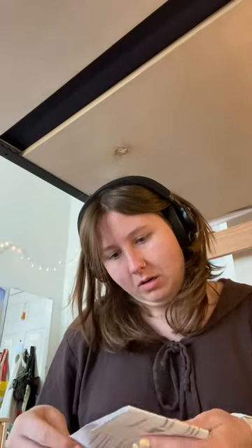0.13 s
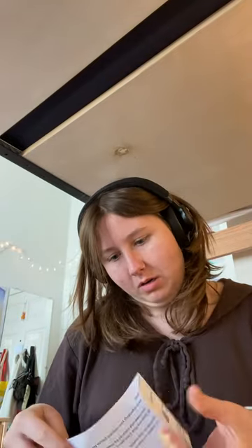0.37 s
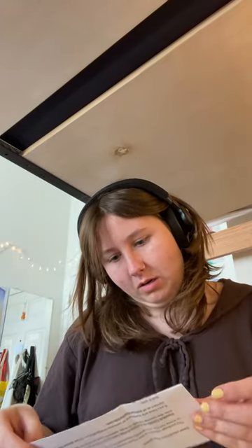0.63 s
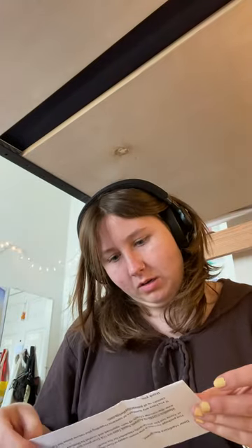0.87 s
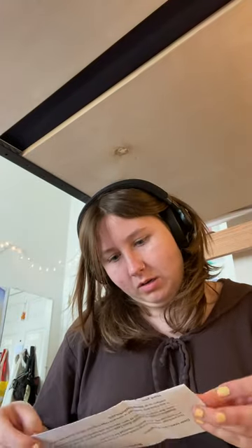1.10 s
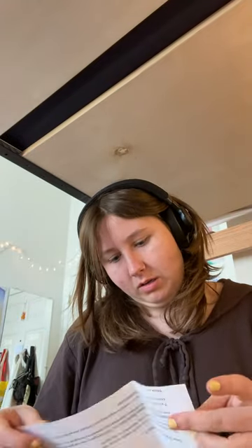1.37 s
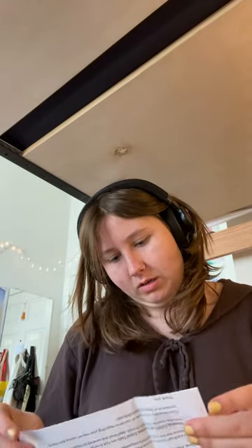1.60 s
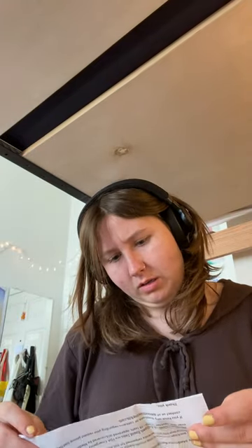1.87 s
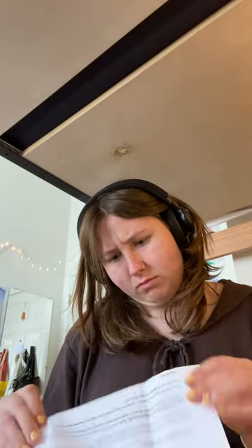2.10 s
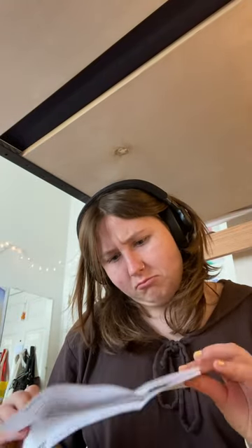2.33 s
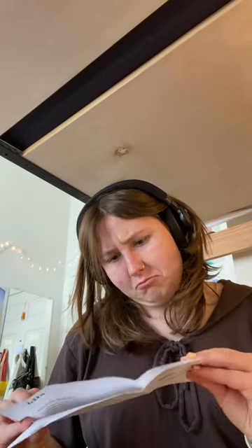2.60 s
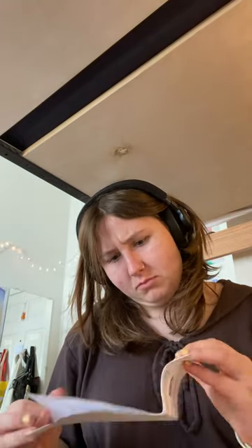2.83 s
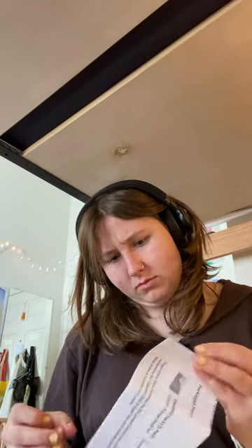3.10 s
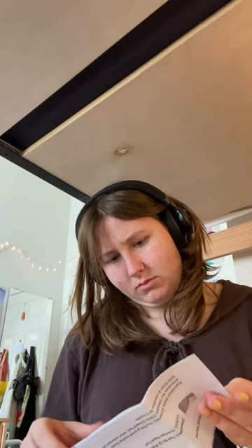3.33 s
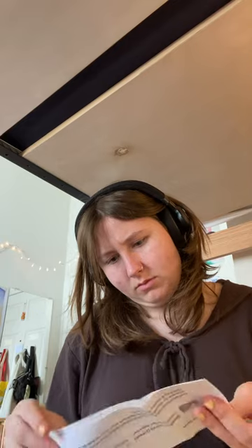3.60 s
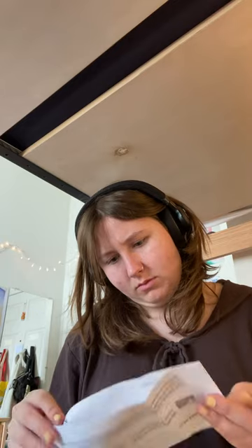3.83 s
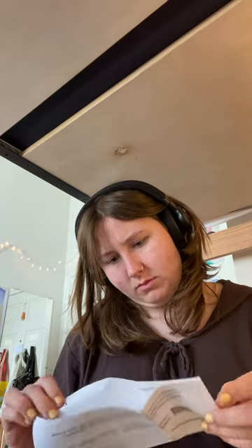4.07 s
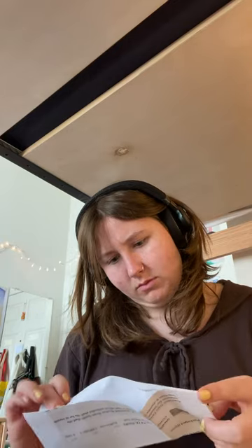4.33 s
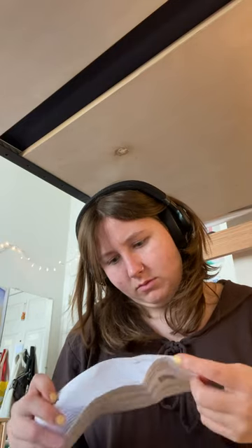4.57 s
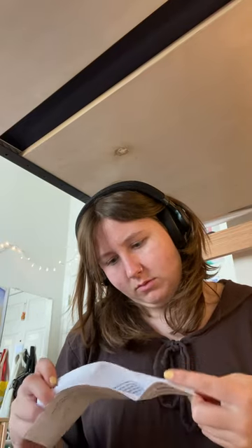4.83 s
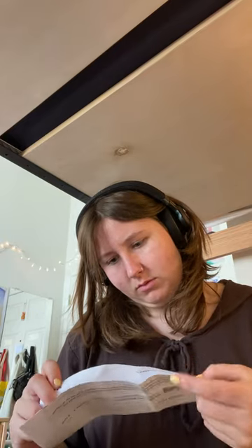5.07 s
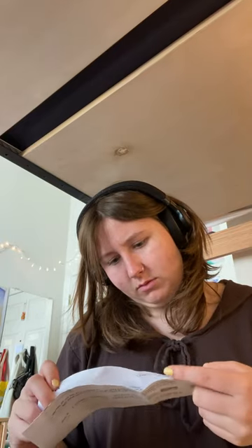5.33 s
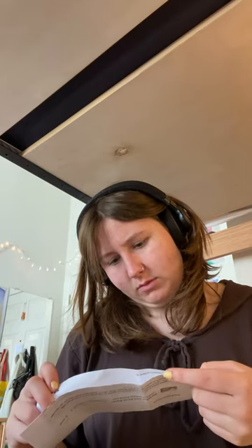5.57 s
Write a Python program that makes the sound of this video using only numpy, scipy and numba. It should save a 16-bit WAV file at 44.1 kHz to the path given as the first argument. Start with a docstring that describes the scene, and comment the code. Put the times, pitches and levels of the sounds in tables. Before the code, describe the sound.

Hands unfold and turn a sheet of paper close to a stereo microphone. A short rustle with small crackles comes first, then a quiet gap, a crisp snap, scattered crinkles, a tight burst of sharp snaps near the middle, a busy swishing rustle ending in the loudest crack, and one more pop before faint ticks. Small quiet room with low ventilation rumble and faint fan hum.

```python
"""A folded sheet of paper is opened, turned and smoothed by hand at a desk in a quiet room.
Fingers and folds slide over the fibres (rustle: filtered trains of tiny slips), creases buckle
(snaps: short noise bursts ringing the sheet) and the sheet flaps (soft low resonances).
Desk and walls echo it to a close pair of microphone ports, over ventilation noise and a fan hum."""
import sys
import numpy as np
from scipy import signal
from scipy.fft import rfft, irfft, next_fast_len
from scipy.io import wavfile
from numba import njit

SR = 44100
rng = np.random.default_rng(int(sys.argv[2]) if len(sys.argv) > 2 else 0)


def amplitude_ratio(level_db):
    """Convert a level in decibels to the matching linear amplitude (field) ratio."""
    exponent = np.asarray(level_db, float) / 20
    return 10 ** exponent


def log_audio(samples):
    """Write samples as a 16-bit WAV file to the path given in sys.argv[1]."""
    # one column per channel
    frames = np.atleast_2d(samples).T
    # limit to full scale, then quantise
    limited = np.clip(frames, -1, 1)
    pcm = np.round(limited * 32767).astype(np.int16)
    wavfile.write(sys.argv[1], SR, pcm)


N = 250884   # samples, about 5.7 s

# Room tone. Each row: frequency in Hz, relative level per Hz in dB.
AIR_SPECTRUM = [(13, -36), (30, -19), (65, 3.5), (95, 2.5), (120, -2), (145, -8), (180, -15), (215, -11.5),
                (400, -15.5), (620, -12.5), (800, -20), (1000, -24), (1700, -26), (2170, -19.5),
                (2760, -31), (4000, -32.5), (6000, -47.5), (13900, -80.5)]
AIR_DB = -54.5
# How alike the room tone is at the two ports. Each row: frequency in Hz, correlation from -1 to 1.
AIR_LIKENESS = [(60, 1), (130, 0.97), (280, 0.66), (610, -0.17), (1320, 0.32), (2860, 0.32), (6200, -1),
                (13400, -0.42)]
# Fan motor tones. Each row: frequency in Hz, width in Hz, level in dB.
FAN_TONES = [(118.9, 9, -67.5), (179.6, 12, -69)]

# Bounce off the desk, a row for the left port, then the right: delay in ms, level in dB.
DESK_BOUNCE = [(.155, -3.5), (0.209, 0)]
BOUNCE_CUT_HZ = 3040   # the desk bounce loses its treble above
# Echo off the nearest hard face, a row for the left port, then the right: delay in ms, level in dB.
WALL_ECHO = [(2.299, -13), (2.452, -25.5)]
RIGHT_LEAD_MS = 0.017   # the sound reaches the right port this much earlier
ROOM_T60_S, ROOM_DB, ROOM_CUT_HZ = 0.14, -15, 20000
# Which hand works the sheet. Each row: time in seconds, left minus right gain in dB.
HANDS = [(0, 0), (1.4, 1.5), (1.75, 0.5), (2.1, 0.5), (2.4, 0.7), (2.7, 0.8), (3.1, 0), (3.3, 0.5),
         (3.65, 0.5), (3.82, 0.3), (4.2, 0.2), (4.6, 0.8), (5.69, 3)]
PORT_CUT_HZ = 10840
SIDE_RISE_HZ, SIDE_RISE_DB = 11600, 29.5   # above this pitch the side is raised: the top treble differs far more between left and right

# Bending modes of the whole sheet. Each row: frequency in Hz, width in Hz, relative level in dB.
SHEET_MODES = [(560, 233, -3), (1132, 170, -0.5), (1595, 560, -3.5), (2137, 400, 6), (3240, 1900, 0.5)]
# Small panels between creases, before the pull shifts their pitch.
# Each row: frequency in Hz, width in Hz, relative level in dB.
SMALL_PANELS = [(3900, 320, 4.5), (4990, 660, 1.5), (6100, 1100, 0.5), (7800, 2100, -7)]
# The hands pull the sheet tauter or let it sag. Each row: time in seconds, # pitch of the third small panel,
# where the singing panel also sits, in Hz, pitch where the body rings best in Hz.
TAUTNESS = [(0, 6100, 1184), (.235, 6100, 1690), (.3, 5500, 2200), (.42, 5800, 1317), (1.4, 5900, 1085),
            (1.63, 6300, 900), (1.69, 6950, 1500), (1.76, 6200, 2200), (2.1, 6100, 1920),
            (2.66, 5500, 1576), (2.73, 5560, 1525), (2.778, 5040, 1820), (3.07, 5940, 1207),
            (3.1, 5850, 1910), (3.21, 6300, 1092), (3.27, 6400, 1300), (3.29, 6200, 1885),
            (3.305, 5900, 1185), (3.6, 6500, 1924), (3.635, 6340, 2000), (3.66, 5630, 2100),
            (3.719, 5740, 1976), (3.74, 5360, 1477), (3.86, 6200, 1730), (4.25, 5900, 988),
            (4.46, 6160, 2000), (4.51, 7020, 892), (4.58, 6050, 1990), (4.62, 4950, 1420),
            (5.69, 6000, 1292)]
BODY_TOP_HZ = 2820   # the body stops ringing above

# The sheet flapping or knocking the desk. Each row: start in seconds, peak in dB, pitch in Hz.
FLAPS = [(.085, -47.5, 532), (.173, -51.5, 547), (.193, -46, 525), (.235, -39, 563), (0.244, -43, 245),
         (0.316, -51.5, 564), (0.334, -50, 148), (1.412, -54.5, 560), (1.634, -49.5, 342),
         (1.637, -44.5, 149), (1.743, -42, 557), (2.063, -52.5, 350), (2.07, -59, 500), (2.084, -53.5, 475),
         (2.109, -50, 390), (2.244, -53, 337), (2.355, -48.5, 444), (2.711, -42, 186), (2.714, -41, 614),
         (2.756, -46, 280), (3.071, -46, 536), (3.142, -43, 410), (3.145, -40.5, 273), (3.151, -44.5, 196),
         (3.158, -52, 363), (3.215, -42, 470), (3.236, -46, 570), (3.261, -50, 590), (3.271, -53, 487),
         (3.303, -43, 393), (3.329, -51, 425), (3.454, -47.5, 480), (3.736, -51, 610), (3.748, -50.5, 167),
         (3.822, -41.5, 504), (3.824, -43.5, 297), (4.009, -49.5, 450), (4.246, -52, 152),
         (4.506, -43, 415), (4.514, -44.5, 154), (4.498, -52, 410), (4.522, -51, 400), (4.53, -48, 480),
         (4.535, -49, 493), (4.553, -53, 600), (4.549, -47, 151), (4.621, -33, 552), (4.623, -38, 300),
         (4.647, -43, 141), (4.783, -55, 153), (5.004, -49.5, 584)]
FLAP_T60_S, FLAP_T60_S_PER_KHZ = 0.016, 0.032   # a tauter, higher panel rings longer

# Creases buckling. Each row: start in seconds, crack peak in dB, crack pitch in Hz,
# body peak in dB, crack t60 in ms (3 at least).
SNAPS = [(0.086, -64, 6420, -46, 12), (0.173, -63, 5060, -43, 15), (0.197, -60, 5000, -48, 17),
         (0.233, -36, 4640, -31.5, 20), (0.2386, -34.5, 3450, -28, 23), (0.3, -32.5, 5440, -50, 18),
         (0.3137, -44, 5570, -39, 20), (0.331, -30, 6500, -41.5, 13), (.348, -47, 4300, -43, 18),
         (.358, -56, 5500, -50, 14), (0.3735, -62, 5170, -54, 13), (0.4238, -49.5, 5000, -45, 18),
         (0.497, -64, 5000, -60, 15), (0.5328, -42, 5960, -55, 21), (1.356, -58, 4340, -46.5, 17),
         (1.381, -57, 3460, -55, 18), (1.411, -58, 5220, -51.5, 11), (1.4917, -52, 4870, -63, 24),
         (1.559, -56.5, 6540, -53, 29), (1.606, -55, 6400, -52, 18), (1.633, -41.5, 6600, -40.5, 31),
         (1.674, -41, 7000, -50, 13), (1.7223, -50, 6760, -51, 17), (1.741, -18.5, 3900, -24.5, 17.6),
         (1.744, -27.5, 3530, -38, 11), (1.756, -42, 6000, -54, 17), (1.826, -43, 3780, -40.5, 25),
         (2.063, -45, 4340, -42, 24), (2.092, -52, 5000, -45, 16), (2.11, -46, 5500, -60, 17),
         (2.1435, -30, 5050, -31, 9.3), (2.2092, -68, 4170, -47.5, 8.4), (2.2412, -36, 5040, -34.5, 25),
         (2.3539, -20, 4860, -33, 9), (2.3564, -24.5, 4900, -46, 12.6), (2.409, -46.5, 5760, -49, 33),
         (2.4964, -45, 4020, -66, 23), (2.5708, -52, 3900, -47, 16), (2.6769, -18.5, 4260, -32.5, 12),
         (2.6788, -22.5, 4160, -42, 13), (2.7087, -25, 4020, -23.5, 8.8), (2.7112, -13, 5750, -25.5, 11),
         (2.7149, -19.5, 4170, -24, 8.3), (2.859, -55, 4000, -52, 16), (2.895, -50, 6000, -60, 18),
         (2.9096, -50, 4180, -67, 29), (2.9686, -44, 3920, -49, 14), (2.977, -47, 5470, -63, 25),
         (3.02, -62, 3590, -51, 12), (3.039, -62, 4000, -49, 10), (3.07, -68, 3600, -36.5, 14),
         (3.099, -34, 6030, -37, 23), (3.1385, -27.5, 6250, -36, 16), (3.145, -31.5, 3800, -48, 16.4),
         (3.213, -68, 5990, -42, 17), (3.2334, -67, 4160, -44, 12), (3.239, -49, 5000, -53, 25),
         (3.247, -45, 7250, -57, 24), (3.2601, -53, 4200, -37.5, 24), (3.2655, -53, 4200, -42, 12),
         (3.271, -52, 4420, -48, 13), (3.2893, -22.5, 5600, -40, 8.7), (3.292, -31, 5030, -43, 14),
         (3.303, -42, 4120, -35, 25), (3.308, -52, 4200, -45, 16), (3.3135, -47, 4200, -46, 14),
         (3.324, -54, 5290, -38.5, 10), (3.4176, -45, 5730, -57, 25), (3.455, -50, 5530, -47, 14),
         (3.4927, -46, 5930, -57, 29), (3.51, -66, 7800, -45, 48), (3.539, -56, 6820, -53, 27),
         (3.601, -31, 4040, -53, 48), (3.633, -39, 6200, -25, 21), (3.637, -36, 5900, -46, 20),
         (3.661, -35.5, 6000, -42, 15), (3.705, -36, 5900, -47, 16), (3.737, -44, 5930, -34.5, 23),
         (3.7425, -56, 5000, -41, 14), (3.821, -10, 5980, -17, 18), (3.8268, -46, 6200, -25.5, 7.1),
         (3.838, -44, 6000, -32.5, 14), (3.861, -39, 6400, -47, 14), (3.985, -46.5, 4830, -56, 17),
         (4, -50, 6870, -47, 14), (4.224, -48.5, 5850, -58, 50), (4.251, -58, 5570, -49, 15),
         (4.2736, -57, 4000, -49, 23), (4.339, -56, 6650, -58, 28), (4.3777, -58, 6960, -50, 17),
         (4.398, -50, 5850, -57, 22), (4.4273, -46, 5200, -62, 27), (4.5076, -54, 6660, -41, 15),
         (4.515, -57, 6000, -48.5, 11), (4.532, -58, 5000, -59, 14), (4.5505, -58, 6830, -53, 21),
         (4.6, -47, 4620, -56, 20), (4.6214, -20.5, 4600, -23.5, 24), (4.64, -34.5, 4400, -38, 30),
         (4.655, -43, 4470, -50, 22), (4.756, -46, 5700, -49, 60), (4.926, -50.5, 4010, -68, 42),
         (4.989, -41.5, 4200, -65, 39), (5.003, -39, 3340, -74, 25), (5.171, -52, 5000, -56, 28),
         (5.4206, -51, 3450, -51, 20), (5.46, -56, 6850, -73, 47), (5.598, -56, 6470, -68, 23)]
SNAP_RISE_S = 0.0012
BODY_OUTLASTS = 1.37   # the body's burst has this many times the t60 of the crack's
BODY_WIDTH_HZ = 1300   # how far the body's favoured pitch reaches in a snap
FIRST_SLIP = 4.0   # the fold giving way, beside random slips averaging about 1

# Fingers and folds sliding, levels before judder and loose ticks. Each row: peak in seconds,
# swell in seconds, fade in seconds (both 0.005 at least), fibre hiss in dB, sheet body in dB.
STROKES = [(.03, 0.46, 0.49, -57, -65.5), (.11, 0.25, 0.37, -63, -67), (.215, 0.037, 0.17, -57, -59),
           (.307, 0.14, 0.071, -52, -56), (.35, .03, 0.032, -67, -51), (.39, 0.027, 0.028, -58.5, -59),
           (.465, 0.031, 0.028, -58, -67), (0.535, 0.11, 0.089, -60, -60), (.6, 0.09, 0.13, -67, -80),
           (1.345, 0.075, 0.086, -58.5, -65), (1.687, 0.015, 0.023, -40, -50),
           (1.706, 0.027, 0.0085, -47, -48.5), (1.727, 0.0046, 0.045, -47, -48.5),
           (1.758, .02, 0.074, -70, -61), (2.07, 0.02, 0.15, -49.5, -52.5), (2.108, 0.12, 0.12, -53, -51),
           (2.371, 0.05, 0.073, -55.5, -62), (2.498, 0.15, 0.039, -72, -76),
           (2.672, 0.035, 0.23, -51.5, -57), (2.721, 0.0094, 0.046, -36, -36.5),
           (2.869, 0.026, 0.048, -54, -67), (2.958, .008, 0.035, -58, -71),
           (2.975, 0.082, 0.37, -65.5, -63), (3.153, 0.23, 0.12, -60.5, -60.5),
           (3.185, .03, .02, -59.5, -62), (3.255, 0.037, 0.072, -56, -61), (3.267, 0.015, .015, -66, -43),
           (3.287, 0.017, 0.017, -53, -56), (3.308, 0.027, 0.022, -71, -40.5),
           (3.419, 0.035, 0.085, -67, -56.5), (3.494, 0.13, 0.025, -62, -63),
           (3.579, 0.015, 0.092, -70, -59), (3.595, 0.016, 1, -57, -55), (3.641, 0.12, 0.14, -41, -46.5),
           (3.7, 0.097, 0.16, -45, -49), (3.737, 0.053, 0.026, -46.5, -40.5),
           (3.855, 0.13, 0.053, -46, -51.5), (3.901, 0.19, 0.017, -52, -54),
           (3.999, 0.087, 0.25, -77, -82.5), (4.129, 0.36, 0.046, -70.5, -70.5),
           (4.237, 0.015, 0.047, -61, -57.5), (4.39, 0.025, .15, -67, -67), (4.448, 0.018, 0.18, -55, -61),
           (4.5, 0.067, 0.08, -52.5, -61), (4.54, .05, 0.12, -55, -67), (4.634, 0.13, 0.062, -50, -56),
           (4.66, .02, .1, -61, -61), (4.764, 0.039, 0.29, -62.5, -64), (4.939, 0.02, 0.032, -56.5, -59),
           (5.001, 0.076, 0.13, -64.5, -61.5), (5.177, 0.023, 0.039, -65.5, -63.5),
           (5.419, 0.033, 0.042, -59.5, -69)]
STROKE_SPAN_DB = 20   # level change over one swell or fade time
STROKE_ROUNDNESS = 1.01   # above 1 a stroke lingers near its peak and stops more abruptly
# The grip keeps a faint rustle between strokes, levels before judder and loose ticks.
# Each row: time in seconds, fibre hiss in dB, sheet body in dB.
GRIP = [(0, -93, -66), (.7, -100, -66), (1.2, -78, -70.5), (1.55, -72, -64.5), (1.8, -69, -65),
        (2.0, -90, -74), (2.5, -74, -68.5), (4.4, -77, -85), (5.69, -85.5, -69)]
JUDDER_DB, JUDDER_RATE_HZ = 1.5, 57   # skin catches and lets go along a stroke
# Colour of the rubbed fibres. Each row: frequency in Hz, relative level per Hz in dB.
FIBRE_SPECTRUM = [(1500, -47), (2500, 7), (3200, -6.5), (4200, -6.5), (6000, -8.5), (7500, -4.5),
                  (9500, -9), (11500, -12), (14000, -57.5)]
# The panel under the finger sings above the rest when the sheet is pulled tight.
# Each row: time in seconds, resonance gain in dB.
SINGING = [(0, -11), (1.6, -10), (1.69, 5), (1.75, -3), (3.58, -11), (3.63, 6), (3.72, 4.5), (3.76, -3),
           (3.85, 3.5), (3.9, -3.5), (4.44, 1), (4.46, 7.5), (4.5, -2), (5.69, -9.5)]
SING_WIDTH_HZ, RUB_WIDTH_HZ = 830, 1000   # widths of the singing panel and of the rubbed body
CRINKLES_PER_S, CRINKLE_DB, CRINKLE_HZ = 250, -15, 4600   # loose ticks; dB beside hiss or body


def rms_one(x):
    """Scale to rms 1."""
    return x / np.sqrt(np.mean(x ** 2) + 1e-20)


def at_hz(points, hz):
    """Read a table on a log-frequency axis."""
    table_hz, values = np.transpose(points)
    return np.interp(np.log(hz), np.log(table_hz), values)


def over_time(points):
    """Read a table of (seconds, value) at every sample."""
    return np.interp(np.arange(N) / SR, *np.transpose(points))


def lowpass(x, order, hz):
    """Butterworth low-pass."""
    return signal.sosfilt(signal.butter(order, hz, fs=SR, output="sos"), x)


def drift(rate_hz):
    """Slow random wander of rms 1: noise through a two-pole low-pass."""
    r = np.exp(-2 * np.pi * rate_hz / SR)
    wander = signal.lfilter([1], [1, -2 * r, r * r], rng.standard_normal(N + SR))
    return rms_one(wander[SR:])


def resonate(x, hz, width_hz):
    """One resonance, gain 1 on top."""
    r = np.exp(-np.pi * width_hz / SR)
    feedback = [1, -2 * r * np.cos(2 * np.pi * hz / SR), r * r]
    return signal.lfilter([(1 - r * r) / 2, 0, (r * r - 1) / 2], feedback, x)


@njit
def glide(x, hz, width_hz):
    """One resonance whose centre moves sample by sample."""
    r = np.exp(-np.pi * width_hz / SR)
    y = np.zeros(len(x))
    for i in range(2, len(x)):
        drive = (1 - r * r) / 2 * (x[i] - x[i - 2])
        y[i] = drive + 2 * r * np.cos(2 * np.pi * hz[i] / SR) * y[i - 1] - r * r * y[i - 2]
    return y


def room_tone():
    """Ventilation rumble and hiss: quarter-octave bands, each with its own likeness between the ports."""
    out = 0
    edges = 22 * 2 ** np.arange(0, 9.5, 1 / 4)
    white = rng.standard_normal((2, 2, N))
    for k, (low, high) in enumerate(zip(edges, edges[1:])):
        band = signal.butter(2, [low, high], "band", fs=SR, output="sos")
        mid, side = signal.sosfilt(band, white[k % 2])   # neighbouring bands use separate noise
        hz = np.sqrt(low * high)
        alike = np.clip(at_hz(AIR_LIKENESS, hz), -1, 1)
        pair = np.sqrt(1 + alike) * mid + np.sqrt(1 - alike) * side * [[1], [-1]]
        out = out + amplitude_ratio(at_hz(AIR_SPECTRUM, hz)) * pair
    return rms_one(out)


def hum():
    """The fan motor drones on two wavering low tones: noise through narrow resonances."""
    out = 0
    for hz, width, db in FAN_TONES:
        tone = resonate(resonate(rng.standard_normal(N), hz, width), hz, width)
        out = out + amplitude_ratio(db) * rms_one(tone)
    return out


def room(x):
    """A diffuse, exponentially dying tail of noise, partly shared between the ports."""
    t = np.arange(SR // 2) / SR
    tail = rng.standard_normal((2, len(t))) * amplitude_ratio(-60 * t / ROOM_T60_S) * (t > .004)
    tail = lowpass(tail, 1, ROOM_CUT_HZ)
    tail = tail + .5 * tail.sum(axis=0)
    tail = tail / np.sqrt(np.sum(tail ** 2) / 2)
    return signal.fftconvolve(x[None], tail, axes=1)[:, :N]


def desk(x):
    """Direct sound plus a dull bounce off the desk and one off a near face, different at each port."""
    size = next_fast_len(N + 512)
    hz = np.arange(size // 2 + 1) * SR / size
    per_ms = -2j * np.pi * hz / 1000   # phase turn for each ms of delay
    dull = 1 / (1 + (hz / BOUNCE_CUT_HZ) ** 4)
    paths = []
    for (desk_ms, desk_db), (wall_ms, wall_db) in zip(DESK_BOUNCE, WALL_ECHO):
        bounce = amplitude_ratio(desk_db) * dull * np.exp(per_ms * desk_ms)
        paths.append(1 + bounce + amplitude_ratio(wall_db) * np.exp(per_ms * wall_ms))
    paths[0] = paths[0] * np.exp(per_ms * RIGHT_LEAD_MS)   # the left port hears it later
    return irfft(rfft(x, size) * np.array(paths), size)[:, :N]


def sheet(x):
    """The bending modes answer in parallel, with alternating sign."""
    return sum((-1) ** k * amplitude_ratio(db) * resonate(x, hz, width)
               for k, (hz, width, db) in enumerate(SHEET_MODES))


def flaps():
    """A soft push of the whole sheet: a few uneven cycles at a pitch set by the free area."""
    size = SR // 6
    out = np.zeros(N + SR)
    t = np.arange(size) / SR
    for s, peak_db, hz in FLAPS:
        noise = rng.standard_normal(size)
        t60 = max(FLAP_T60_S + FLAP_T60_S_PER_KHZ * hz / 1000, .005)
        push = np.abs(noise) * np.exp(-t / 0.0055) + 0.034 * noise * amplitude_ratio(-60 * t / t60)
        flap = resonate(resonate(push, hz, 1.6 / t60 + 0.043 * hz), hz, 7.6 * hz)
        at = round(s * SR)
        out[at:at + size] += amplitude_ratio(peak_db) * flap / np.abs(flap).max()
    return out[:N]


def snaps():
    """A crease lets go as a swelling, then dying burst of slips: a bright crack and the body ringing."""
    size = SR // 10
    out = np.zeros(N + SR)
    t = np.arange(size) / SR
    taut_s, _, body_hz = np.transpose(TAUTNESS)
    chance = rng.standard_normal((len(SNAPS), 2, size))   # for each snap, a row for crack and for body
    for (s, crack_db, crack_hz, body_db, t60_ms), noise in zip(SNAPS, chance):
        slips = noise * np.abs(noise) ** .8   # a few large slips stand out
        slips[:, round(SNAP_RISE_S * SR)] += FIRST_SLIP * np.sign(noise[:, 0])
        t60 = np.array([[1], [BODY_OUTLASTS]]) * max(t60_ms, 3) / 1000
        swell = np.minimum(t / SNAP_RISE_S, 1) ** 2
        burst = slips * swell * amplitude_ratio(-60 * np.maximum(t - SNAP_RISE_S, 0) / t60)
        crack = resonate(resonate(burst[0], crack_hz, 3900), crack_hz, 2600)
        ringing = sheet(burst[1])
        favoured = resonate(ringing, np.interp(s, taut_s, body_hz), BODY_WIDTH_HZ)
        body = lowpass(amplitude_ratio(-11.0) * ringing + favoured, 4, BODY_TOP_HZ)
        at = round(s * SR)
        for part, db in ((crack, crack_db), (body, body_db)):
            out[at:at + size] += amplitude_ratio(db) * part / np.abs(part).max()
    return out[:N]


def grains(per_s, spread_db, clump_db):
    """Tiny fibre slips of uneven size, larger in clumps; rms 1."""
    slips = rng.random(N) < per_s / SR
    sizes = amplitude_ratio(spread_db * np.minimum(rng.exponential(1, N), 4) + clump_db * drift(21))
    return rms_one(slips * sizes * rng.choice([-1, 1], N))


def panels(x, modes, shift_db, bend, taut):
    """The sheet changes shape in the hands: each mode follows the pull, wanders in pitch, swells and fades."""
    out = 0
    for hz, width, db in modes:
        gain = amplitude_ratio(db + shift_db * drift(2.9))
        centre_hz = hz * taut * np.exp(bend * drift(2.4))
        out = out + gain * glide(x, centre_hz, width)
    return out


def stroke_gains():
    """Each stroke swells to its peak and fades again; strokes and grip add as power."""
    t = np.arange(0, N + 64, 64) / SR
    s, *grip_db = np.transpose(GRIP)
    power = np.array([amplitude_ratio(np.interp(t, s, db)) ** 2 for db in grip_db])
    for peak, swell, fade, *db in STROKES:
        away = np.where(t < peak, (peak - t) / max(swell, .005), (t - peak) / max(fade, .005))
        level_db = np.array(db)[:, None] - STROKE_SPAN_DB * away ** STROKE_ROUNDNESS
        power = power + amplitude_ratio(level_db) ** 2
    return [np.interp(np.arange(N) / SR, t, np.sqrt(p)) * amplitude_ratio(JUDDER_DB * drift(JUDDER_RATE_HZ))
            for p in power]


def slides():
    """Rubbing hisses in the fibres, sets off small crackles in the body of the sheet and loose ticks."""
    hiss_gain, body_gain = stroke_gains()
    s, *pitches = np.transpose(TAUTNESS)
    panel_hz, body_hz = (np.interp(np.arange(N) / SR, s, p) for p in pitches)

    hz = np.arange(N // 2 + 1) * SR / N + 1   # 1 Hz up, to keep the logarithm finite
    fibres = grains(9000, spread_db=2.0, clump_db=1.0)
    hiss = irfft(rfft(fibres) * amplitude_ratio(at_hz(FIBRE_SPECTRUM, hz)), N)
    taut = panel_hz / SMALL_PANELS[2][0]
    hiss = hiss + amplitude_ratio(-1.0) * panels(hiss, SMALL_PANELS, shift_db=4.0, bend=0.042, taut=taut)
    hiss = hiss + amplitude_ratio(over_time(SINGING)) * glide(hiss, panel_hz, SING_WIDTH_HZ)

    crackle = panels(grains(2500, spread_db=3.8, clump_db=1.5), SHEET_MODES, shift_db=1.5, bend=.05, taut=1)
    body = amplitude_ratio(3.0) * crackle + glide(crackle, body_hz, RUB_WIDTH_HZ)
    body = lowpass(body, 4, BODY_TOP_HZ)

    ticks = grains(CRINKLES_PER_S, spread_db=-0.5, clump_db=5.0)
    bright_ticks = rms_one(resonate(resonate(ticks, CRINKLE_HZ, 6600), CRINKLE_HZ, 3700))
    body_ticks = rms_one(sheet(ticks))
    bright = hiss_gain * (rms_one(hiss) + amplitude_ratio(CRINKLE_DB) * bright_ticks)
    return bright + body_gain * (rms_one(body) + amplitude_ratio(CRINKLE_DB) * body_ticks)


def scene():
    """Paper through desk and room, over the room tone and hum."""
    paper = slides() + snaps() + flaps()
    lean_db = over_time(HANDS) / 2
    near = desk(paper) * amplitude_ratio([lean_db, -lean_db])
    return near + amplitude_ratio(ROOM_DB) * room(paper) + amplitude_ratio(AIR_DB) * room_tone() + hum()


def low_pass(x):
    """Removes everything above the highest recorded frequency."""
    return signal.sosfilt(signal.butter(12, 14020, fs=SR, output="sos"), x)


def record(dry):
    """The close pair of microphone ports rolls off the top; above it the side is raised, so the top treble
    differs more between left and right."""
    left, right = lowpass(dry, 8, PORT_CUT_HZ)
    hz = np.arange(N // 2 + 1) * SR / N + 1   # 1 Hz up, to avoid dividing by zero
    side_gain = amplitude_ratio(SIDE_RISE_DB / (1 + (SIDE_RISE_HZ / hz) ** 20))
    side = irfft(rfft(left - right) * side_gain, N)
    mid = left + right
    return low_pass(np.array([mid + side, mid - side]) / 2)


dry = scene()
out = record(dry)
log_audio(out)
```